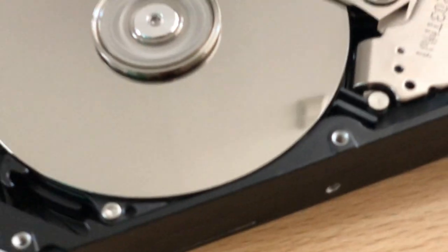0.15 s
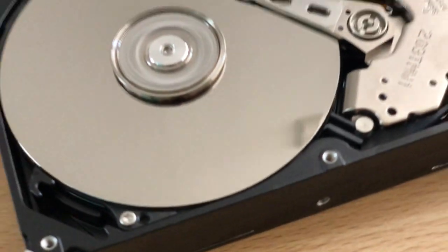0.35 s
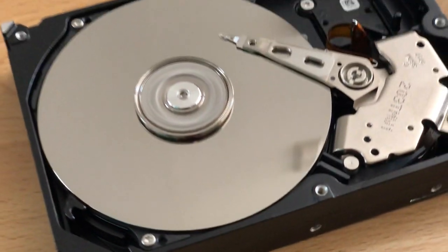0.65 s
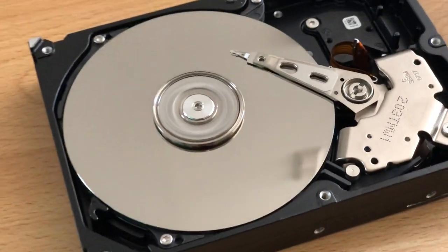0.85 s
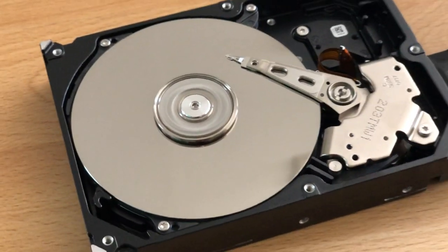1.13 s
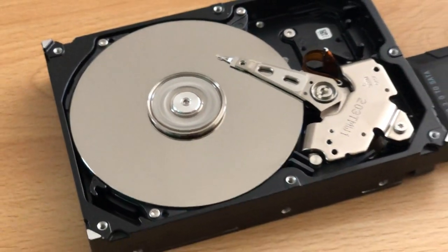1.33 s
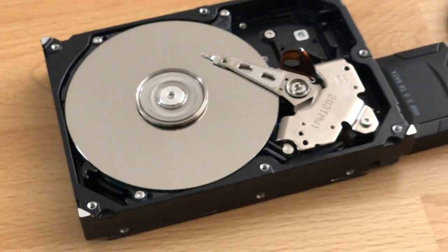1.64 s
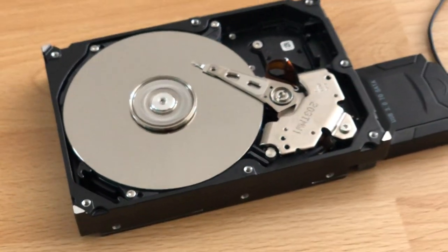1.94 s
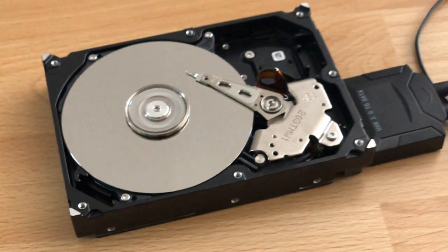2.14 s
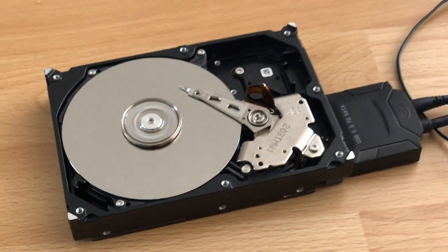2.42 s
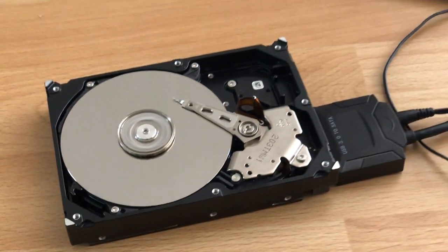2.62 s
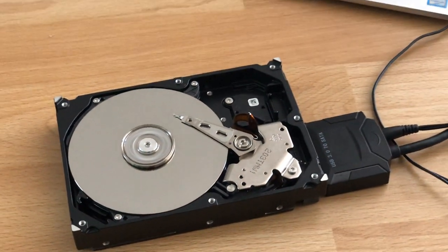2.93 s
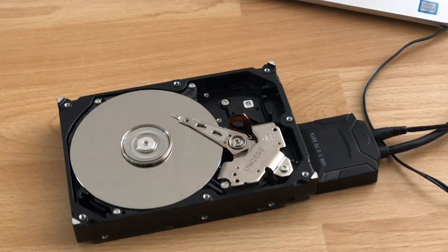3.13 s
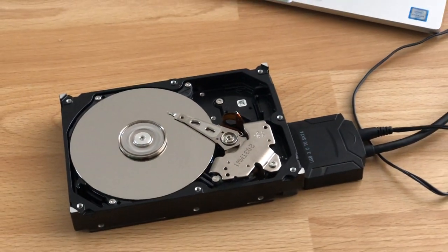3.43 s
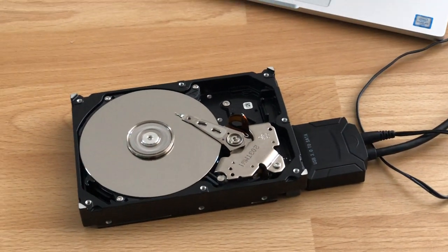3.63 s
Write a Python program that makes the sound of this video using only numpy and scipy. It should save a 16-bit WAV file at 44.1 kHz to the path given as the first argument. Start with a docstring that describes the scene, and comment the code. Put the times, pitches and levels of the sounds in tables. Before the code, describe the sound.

Rapid, irregular ticks from an open hard drive chop up a high whistle, with tiny metallic pings on the hardest ones. The spinning platter hisses and hums faintly against the table, and the chatter softens as the close microphone retreats.

```python
"""Quick, uneven rasping ticks cut into a thin whistle: an open hard drive at work on a table.
Between seeks the head servo swells into the whistle; each seek rasps through the arm and the
frame and chokes it, and the hardest seeks make the arm ping. Underneath are the hiss of air on the
platter and the hum of the spindle. Rasp and hiss ease off as the microphone slowly backs away."""
import sys
import numpy as np
from scipy import signal
from scipy.fft import rfft, irfft
from scipy.io import wavfile

SR = 44100
rng = np.random.default_rng(int(sys.argv[2]) if len(sys.argv) > 2 else 0)


def waveform_to_disk(signal):
    """Save audio, clipped to [-1, 1], as 16-bit WAV at the path in sys.argv[1]."""
    frames = np.transpose(np.atleast_2d(signal))
    scaled = np.clip(frames, -1, 1) * 32767
    samples = np.round(scaled).astype(np.int16)
    wavfile.write(sys.argv[1], SR, samples)


N = 166257
T = np.arange(N) / SR

# Fader moves for the spindle hum through the table: time_s, low_line_db, upper_line_db
HUM_LEVELS = [(0, -70, -71), (.5, -64, -65.5), (.9, -58.5, -63.5), (2.1, -63.5, -69.5), (2.75, -58, -75),
              (3.77, -54.5, -75)]
# EQ curve of the air on the platter: frequency_hz, relative_db
AIR_SPECTRUM = [(25, -43), (65, -2), (190, -4), (420, -10.5), (1200, -1), (1480, 9.5), (3200, 3.5),
                (8000, -3.5), (15500, -21.5)]
# Resonances of arm and frame: pitch_hz, relative_db
BODY_MODES = [(1840, 1.5), (1985, 2.5), (2330, 12), (2800, 6), (3615, 0.5), (4220, -7.5), (4380, 0.5),
              (4575, -6), (5130, 1), (5360, 9), (5950, 2.5), (6210, 2.5), (8620, -12), (9600, -6)]
# Thin upper rings that glint differently in each seek: pitch_hz, width_hz, gain_db, drift_db_per_s
GLINT_MODES = [(10550, 140, -21.5, 1.67), (11860, 410, -24, -2), (14300, 400, -35.5, -6)]
# Pings of the arm on hard seeks: peak_time_s, level_db
ARM_PINGS = [(0.178, -23.5), (0.255, -24), (0.287, -21.5), (0.394, -19), (0.417, -25.5), (0.657, -20.5),
             (0.716, -19.5), (0.778, -22), (0.909, -22.1), (1.032, -25.5), (1.078, -23.5), (1.109, -29),
             (1.151, -22), (1.192, -27), (1.254, -25), (1.452, -35), (1.671, -22.5), (1.984, -29),
             (2.133, -25), (2.725, -28), (3.123, -33), (3.19, -24), (3.253, -27.4), (3.368, -26.5),
             (3.531, -29.5), (3.575, -26.5), (3.68, -27.7)]
# Seeks of the arm, with the crest the whistle has reached at each: start_s, length_s, relative_crest_db
ARM_SEEKS = [(0.0497, 0.0087, -18.0), (0.0834, 0.015, -19), (0.1391, 0.0109, -17.5),
             (0.1708, 0.0125, -16.5), (0.1988, 0.011, -16), (0.2486, 0.0095, -15), (0.2846, 0.0083, -18.5),
             (0.304, 0.0071, -16), (0.337, 0.0075, -17.5), (0.366, 0.057, -15.5), (0.4584, 0.01, -18),
             (0.5032, 0.0087, -18.5), (0.551, 0.014, -18), (0.588, 0.0075, -22), (0.6196, 0.0094, -19.5),
             (0.6444, 0.016, -22), (0.6978, 0.0395, -21.5), (0.7724, 0.014, -22), (0.8066, 0.0133, -20.5),
             (0.8414, 0.0093, -21), (0.873, 0.0084, -20.5), (0.8908, 0.014, -20.5), (0.938, 0.0096, -22.5),
             (0.9608, 0.011, -21.0), (1.008, 0.0076, -18.5), (1.03, 0.0063, -19), (1.074, 0.007, -23),
             (1.0963, 0.0239, -19), (1.1404, 0.017, -21.5), (1.188, 0.011, -25), (1.2023, 0.0142, -22.5),
             (1.245, 0.026, -24.5), (1.319, 0.0066, -21.0), (1.3638, 0.025, -19.5), (1.396, 0.0074, -24.5),
             (1.4413, 0.032, -19.5), (1.4892, 0.0081, -22.5), (1.5246, 0.0028, -22), (1.5517, 0.015, -21.5),
             (1.6145, 0.0077, -22), (1.632, 0.012, -21.5), (1.6566, 0.0028, -20.5), (1.6684, 0.023, -24),
             (1.7224, 0.016, -22.5), (1.752, 0.014, -25.5), (1.792, 0.0068, -21), (1.8182, 0.011, -22),
             (1.855, 0.0025, -22.5), (1.8668, 0.023, -22.4), (1.912, 0.0126, -22.5),
             (1.9449, 0.0083, -20.5), (1.9735, 0.03, -22.5), (2.034, 0.0072, -24), (2.05, 0.0075, -33),
             (2.0663, 0.0078, -22), (2.082, 0.0053, -26.4), (2.0996, 0.0044, -24.5), (2.1147, 0.0039, -20),
             (2.1284, 0.024, -26.5), (2.193, 0.012, -24.3), (2.212, 0.0033, -25), (2.224, 0.0098, -25.0),
             (2.254, 0.011, -25), (2.289, 0.0022, -23), (2.3021, 0.0039, -20), (2.329, 0.0244, -23.5),
             (2.3805, 0.011, -20.5), (2.3997, 0.004, -25.5), (2.4117, 0.0028, -21), (2.44, 0.0106, -23),
             (2.475, 0.0065, -21), (2.494, 0.0116, -25), (2.5263, 0.0051, -21.5), (2.539, 0.0089, -21),
             (2.554, 0.0053, -26.5), (2.5875, 0.0082, -20), (2.628, 0.0154, -25), (2.6606, 0.017, -24.5),
             (2.6924, 0.0087, -23.5), (2.7075, 0.036, -27), (2.756, 0.0026, -25), (2.765, 0.018, -35),
             (2.829, 0.02, -24), (2.856, 0.015, -25), (2.89, 0.0091, -24.7), (2.921, 0.0088, -25.5),
             (2.9585, 0.014, -26.5), (2.989, 0.015, -25), (3.0095, 0.009, -26), (3.026, 0.012, -26.5),
             (3.0733, 0.01, -22), (3.096, 0.0036, -25), (3.1094, 0.025, -23.5), (3.1597, 0.0062, -23),
             (3.18, 0.018, -25.5), (3.215, 0.015, -24.5), (3.2414, 0.025, -26), (3.276, 0.0166, -23.8),
             (3.3347, 0.0058, -24), (3.3483, 0.025, -24.9), (3.43, 0.011, -21.5), (3.46, 0.008, -22.4),
             (3.4929, 0.0081, -23), (3.5173, 0.018, -25.5), (3.5657, 0.018, -24.5), (3.6177, 0.011, -26.5),
             (3.671, 0.0081, -25), (3.704, 0.0091, -22.5), (3.725, 0.011, -25), (3.7546, 0.011, -26.5)]


def amp(db):
    """Decibels to gain."""
    return 10 ** (np.asarray(db) / 20)


def unit(x):
    """Scales to rms 1."""
    return x / np.sqrt(np.mean(x ** 2) + 1e-20)


def lowpass(x, corner_hz):
    """Zero-phase high cut, 24 dB per octave."""
    hz = np.fft.rfftfreq(N, 1 / SR)
    return irfft(rfft(x) / (1 + (hz / corner_hz) ** 4), N)


def wander(rate_hz):
    """Smooth random modulation of rms 1."""
    return unit(lowpass(rng.standard_normal(N), rate_hz))


def spindle_hum():
    """The spindle hums through the table: three low lines, each wavering slightly in pitch."""
    times, low_db, upper_db = np.transpose(HUM_LEVELS)
    lines = [(81.5, np.interp(T, times, low_db)), (165.3, np.interp(T, times, upper_db)), (102, -68.5)]
    hum = np.zeros(N)
    for pitch_hz, rms_db in lines:
        hz = pitch_hz + 0.88 * wander(rate_hz=7.4)
        hum += np.sqrt(2) * amp(rms_db) * np.sin(2 * np.pi * np.cumsum(hz) / SR)
    return hum


def platter_air():
    """A bed of hiss from air on the platter; the lows hold while the treble fades with distance."""
    gain_db, treble_db_per_s = -40.5, -2
    hz = np.fft.rfftfreq(N, 1 / SR)
    curve_hz, curve_db = np.transpose(AIR_SPECTRUM)
    eq = amp(np.interp(np.log(hz + 1), np.log(curve_hz), curve_db))
    air = unit(irfft(rfft(rng.standard_normal(N)) * eq, N))
    lows = lowpass(air, corner_hz=390)
    return amp(gain_db) * (lows + (air - lows) * amp(treble_db_per_s * T))


def ring(x, hz, width_hz):
    """One decaying mode that keeps the power of white noise."""
    t = T[:SR // 20]
    mode = np.exp(-np.pi * width_hz * t) * np.sin(2 * np.pi * hz * t)
    return signal.oaconvolve(x, mode / np.linalg.norm(mode))[:N]


def arm_and_frame(force, q=17.1):
    """Colours a force with the resonances of arm and frame, all damped alike."""
    hz = abs(np.fft.fftfreq(2048, 1 / SR))
    power = sum(amp(db) ** 2 / (1 + (2 * q * (hz / pitch_hz - 1)) ** 2) ** 2
                for pitch_hz, db in BODY_MODES)
    # minimum phase, so the ringing follows the hit
    response = np.exp(signal.hilbert(np.log(power) / 2).conj())
    taps = np.fft.ifft(response).real
    return signal.oaconvolve(force, taps / np.linalg.norm(taps))[:N]


def coil_force():
    """Coil current pushes the arm in one gritty burst per seek; faint tracking jitter fills the gaps."""
    attack_s, release_s, brake_s = 0.00031, 0.0026, 0.0036
    seek_db_per_s, tracking_db_per_s = -1.5844, -0.25
    effort = amp(-43.5 + tracking_db_per_s * T)
    for start, length, _ in ARM_SEEKS:
        near = abs(T - start) < 0.1
        t = T[near] - start
        attack = np.clip(t / attack_s, 0, 1)
        release = np.exp(-np.maximum(t - length + brake_s, 0) / release_s)
        effort[near] += amp(-26.5 + seek_db_per_s * start + rng.standard_normal()) * attack * release
    grit = unit(rng.standard_normal(N) * amp(2.5 * wander(rate_hz=2100)))
    return grit * effort


def seek_rasp():
    """The coil's force rasps through arm and frame, topped with glints and a bright snap."""
    snap_band_hz, snap_db_per_s = (3625, 10512.5), -1
    force = coil_force()
    glints = sum(amp(db + drift * T + 4 * wander(rate_hz=42)) * ring(force, hz, width)
                 for hz, width, db, drift in GLINT_MODES)
    snap = signal.lfilter(*signal.butter(2, snap_band_hz, "bandpass", fs=SR), force)
    return amp(-2.5) * arm_and_frame(force) + glints + amp(-13.5 + snap_db_per_s * T) * snap


def arm_pings():
    """The arm's main ring flares up for a few milliseconds in the hardest seeks."""
    pitch_hz, spread_hz, flare_s = 5313, 19, 0.0026
    pings = np.zeros(N)
    for peak_s, db in ARM_PINGS:
        hz = rng.normal(pitch_hz, spread_hz)
        flare = np.exp(-np.minimum(((T - peak_s) / flare_s) ** 2 / 2, 20))
        pings += amp(db) * flare * np.sin(2 * np.pi * hz * T)
    return pings


def whistle_envelope(choke_s):
    """Level ride in dB: hold the crest, duck (deeper for a longer seek), swell to the next crest."""
    hold_s, deepest_db, depth_db_per_s, swell_db_per_s = 0.00248, 13.5, 2595, 605
    start, length, crest_db = np.transpose(ARM_SEEKS)
    depth_luck, swell_luck = rng.standard_normal((len(start), 2)).T
    ducked_db = crest_db - np.minimum(depth_db_per_s * length, deepest_db) + 0.5 * depth_luck
    gap_s = np.diff(start, append=start[-1] + 2 * choke_s) - hold_s
    fall_s = np.minimum(choke_s, gap_s / 2)
    swell_rate = swell_db_per_s * np.exp(0.32 * swell_luck)
    climb_s = np.clip((np.roll(crest_db, -1) - ducked_db) / swell_rate, gap_s / 10, gap_s - fall_s)
    hold_end = start + hold_s
    times = np.column_stack([start, hold_end, hold_end + fall_s, hold_end + gap_s - climb_s]).ravel()
    levels_db = np.column_stack([crest_db, crest_db, ducked_db, ducked_db]).ravel()
    lead_in_db = np.clip((start[0] - T) * swell_db_per_s, 0, deepest_db)
    return np.interp(T, times, levels_db) - lead_in_db


def servo_whistle():
    """The servo's oscillation swells up to each seek, which chokes it and pulls it sharp."""
    pitch_hz, pull_hz, choke_s, trim_db = 2239.6, 50.22, 0.005, -0.5
    envelope_db = whistle_envelope(choke_s)
    choking = sum((T > start) & (T < start + min(length, choke_s)) for start, length, _ in ARM_SEEKS)
    waver_hz = 6.66 * wander(rate_hz=129) + 8.38 * wander(rate_hz=13.6)
    hz = pitch_hz + pull_hz * choking + waver_hz
    flutter_db = 0.5 * wander(rate_hz=170)
    return amp(trim_db + envelope_db + flutter_db) * np.sin(2 * np.pi * np.cumsum(hz) / SR)


def scene():
    """The mono mix of the drive; rasp and hiss have a hollow just below the whistle."""
    hollow = signal.iirnotch(2170, Q=9.9, fs=SR)
    noise = signal.lfilter(*hollow, seek_rasp() + platter_air())
    return (noise + arm_pings() + servo_whistle() + spindle_hum())[None]


def record(dry):
    """A steep high cut takes the very top off the mix."""
    high_cut = signal.firwin(511, cutoff=15700, window=("kaiser", 9), fs=SR)
    return signal.oaconvolve(dry, high_cut[None], "same")


dry = scene()
out = record(dry)
waveform_to_disk(out)
```